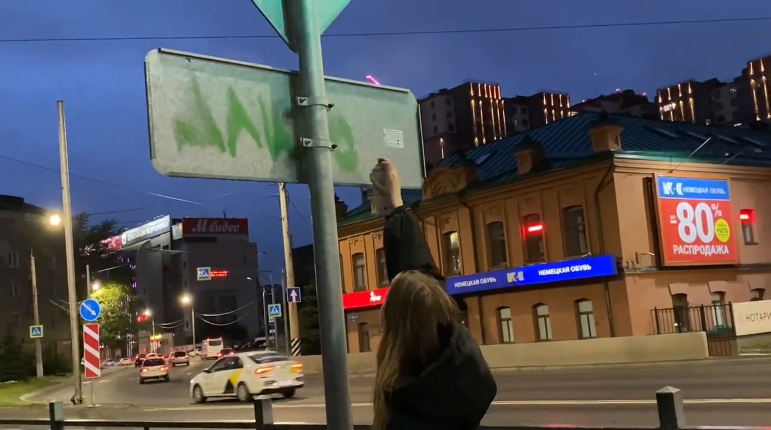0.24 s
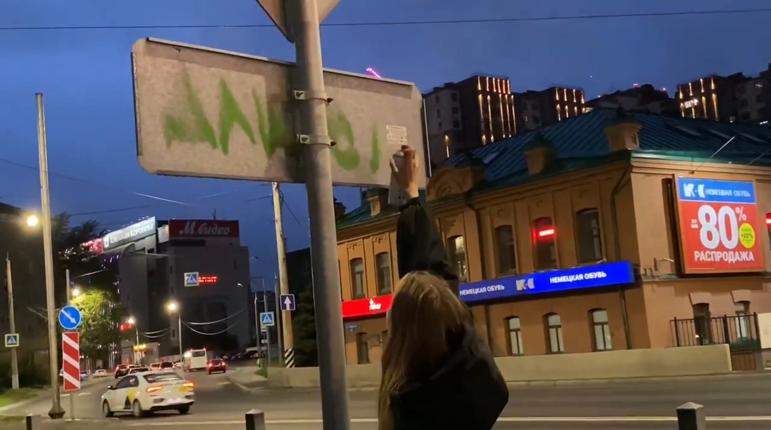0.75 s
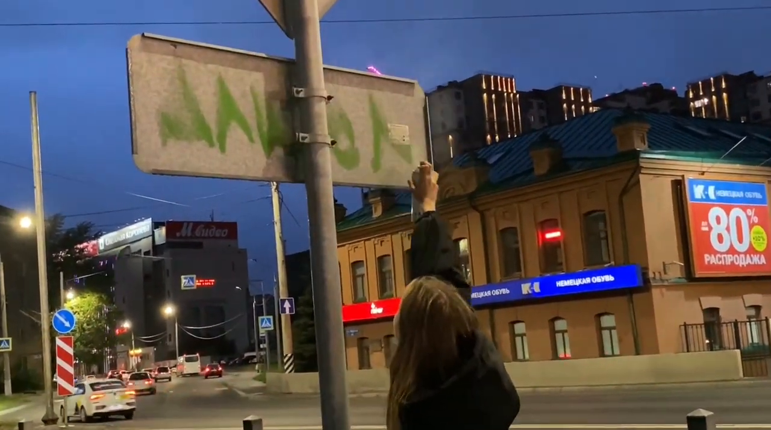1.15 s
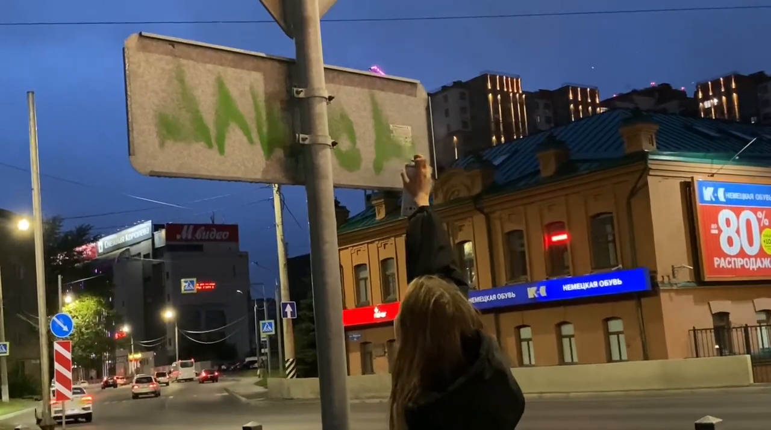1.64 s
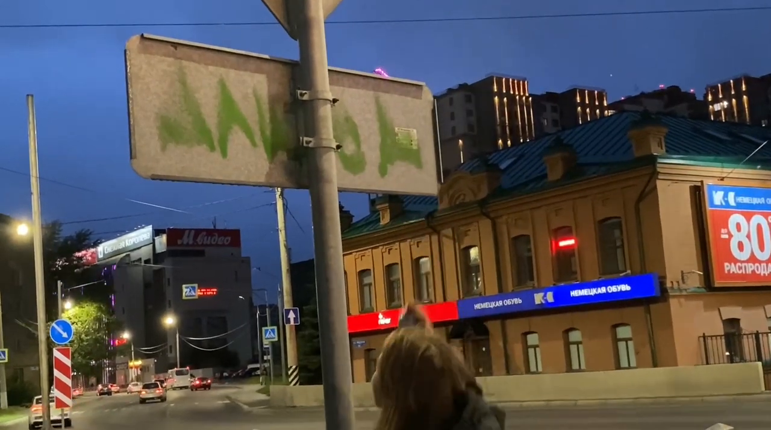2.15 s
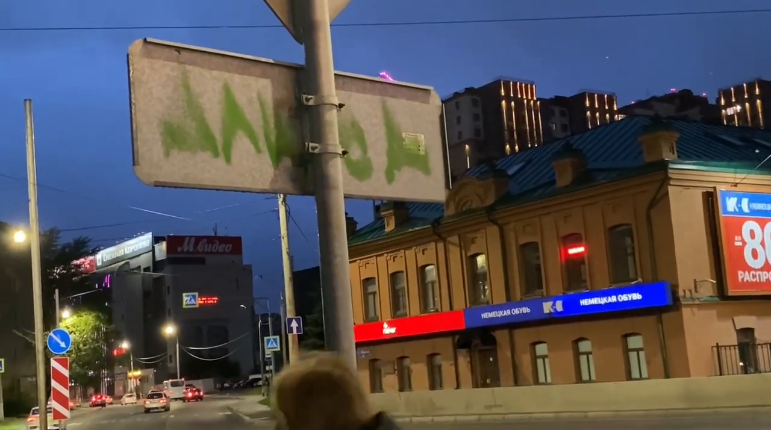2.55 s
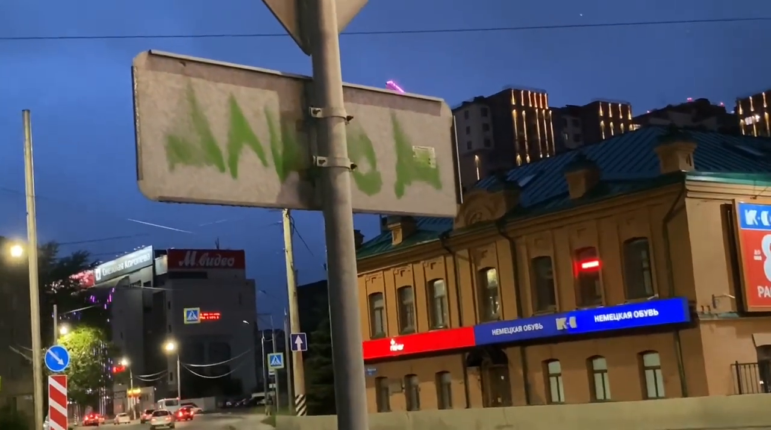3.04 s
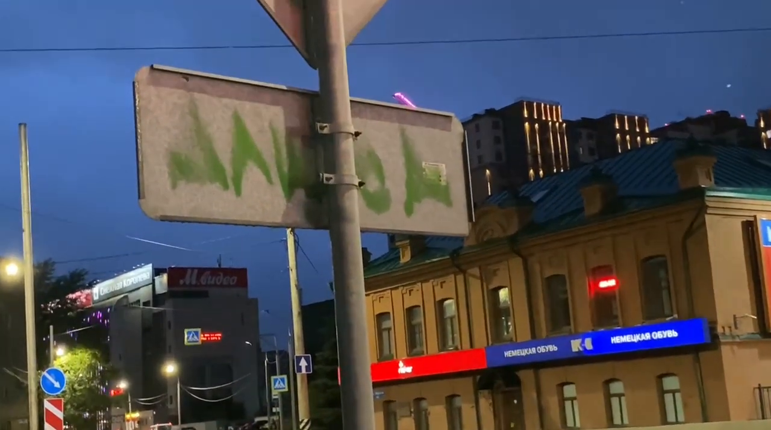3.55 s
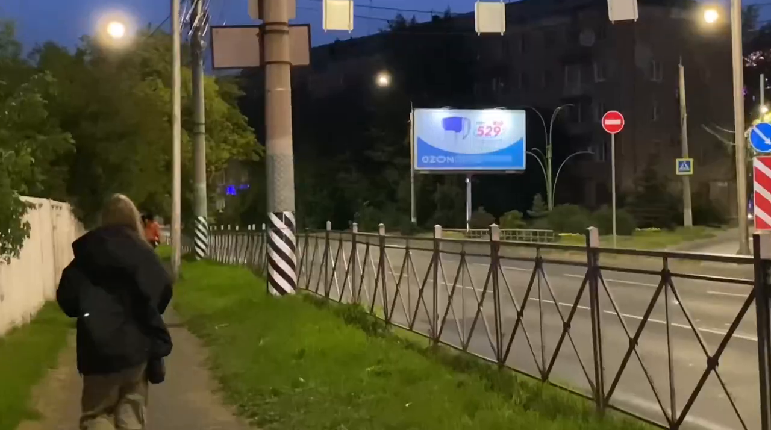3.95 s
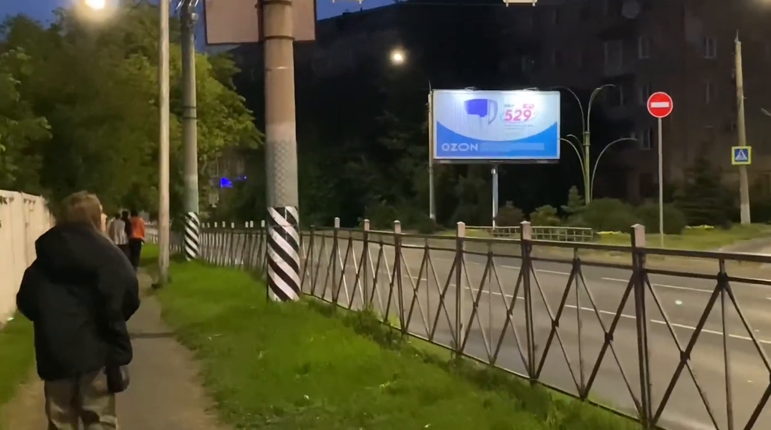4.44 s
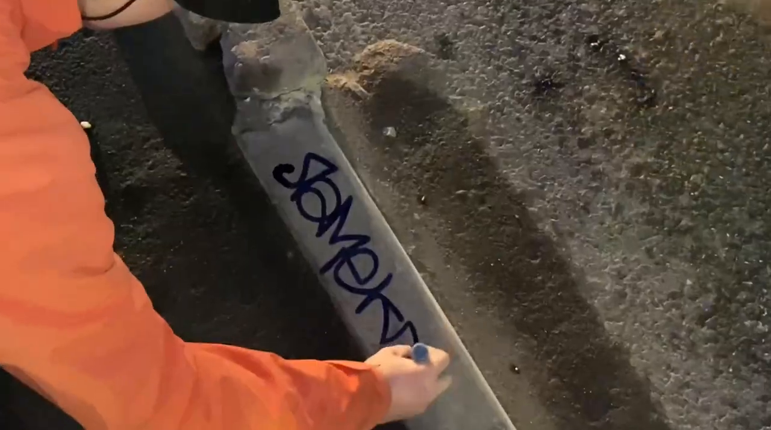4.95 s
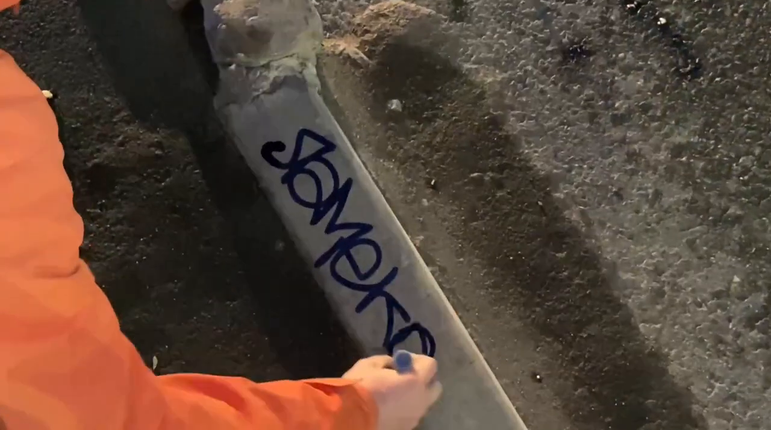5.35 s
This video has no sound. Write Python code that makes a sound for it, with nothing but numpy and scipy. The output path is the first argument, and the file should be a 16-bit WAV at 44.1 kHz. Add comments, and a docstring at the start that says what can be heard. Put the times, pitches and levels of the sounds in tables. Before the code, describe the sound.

Three roadside spots joined by hard cuts. First, low exhaust rumble, tyre roar, an idling drone and gliding engine notes, with light dry scratching close by. Then a softer, more distant street with hardly any detail. Last, loud low gusts and thumps overload the handheld microphone while a felt tip rasps on a hard surface.

```python
"""By a city road at night, heard from three spots cut hard one after the other.
Banded noise makes exhaust rumble, tyre roar and hiss; wavering sines make a drone and engine notes.
A marker scratches faintly close by as flickering treble noise, among light ticks of steps and pen.
At the last spot strong wind rumbles and slaps across the microphone ports as gusty low noise."""
import sys
import numpy as np
from scipy import signal
from scipy.fft import rfft, irfft, next_fast_len
from scipy.io import wavfile
from scipy.ndimage import uniform_filter1d

SR = 44100
rng = np.random.default_rng(int(sys.argv[2]) if len(sys.argv) > 2 else 0)


def wav_record(signal):
    """Record a signal, one row per channel, as 16-bit PCM in the file named by sys.argv[1]."""
    frames = np.transpose(np.atleast_2d(signal))
    bounded = np.clip(frames, -1, 1)
    # unit amplitude maps onto the largest positive 16-bit level
    quanta = np.round(bounded * 32767).astype(np.int16)
    wavfile.write(sys.argv[1], SR, quanta)


def to_linear_factor(level_db):
    """Convert decibel levels (scalar or array-like) to linear amplitude factors."""
    exponent = np.asarray(level_db, float) / 20
    return 10 ** exponent


N = 246940

# stay at each spot by the road: (start [s], end [s])
SPOTS = [(0, 3.8712), (3.879, 4.7935), (4.795, 5.6)]


def rms_one(x):
    """Scales to rms 1."""
    return x / np.sqrt(np.mean(x ** 2) + 1e-20)


def in_time(rows):
    """Columns of a table joined by straight lines, one value a sample."""
    s, *columns = np.transpose(rows)
    return [np.interp(np.arange(N) / SR, s, c) for c in columns]


def at_hz(points, hz):
    """Reads a spectrum on a log axis."""
    point_hz, point_db = np.array(points).T
    return np.interp(np.log(hz), np.log(point_hz), point_db)


def drift(rate_hz, size=N):
    """Slow chance through a double one-pole low-pass, drawn every 40 samples; spread 1."""
    r = np.exp(-80 * np.pi * rate_hz / SR)
    slow = signal.lfilter([1], [1, -2 * r, r * r], rng.standard_normal(size // 40 + 2002))[2000:]
    return np.interp(np.arange(size) / 40, np.arange(len(slow)), rms_one(slow))


def band(x, low_hz, high_hz, order=2):
    """Band-pass."""
    return signal.sosfilt(signal.butter(order, [low_hz, high_hz], "band", fs=SR, output="sos"), x)


def evened(x, span_s):
    """Noise with its own swells flattened, rms 1."""
    swell = np.sqrt(uniform_filter1d(x ** 2, int(span_s * SR), axis=-1) + 1e-12)
    return rms_one(x / swell)


def gate(spot):
    """Open while one spot is heard: short fade in, hard cut out."""
    # one fade a spot: (length [s])
    fade_in_s = [0.00025, 0.014, 0.0044]
    t = np.arange(N) / SR
    start, end = SPOTS[spot]
    return np.clip((t - start) / fade_in_s[spot], 0, 1) * (t < end)


def tone(hz, level_db, waver_hz):
    """A sine whose pitch wavers, at the given rms level."""
    phase = 2 * np.pi * np.cumsum(hz + waver_hz * drift(5.76)) / SR
    return np.sqrt(2) * to_linear_factor(level_db) * np.sin(phase)


def puffs(rows, noise):
    """Each row opens a bell-shaped window on its noise, centred on its time, with the given rms at the top."""
    out = np.zeros((2, N))
    for (s, level_db, length_ms), air in zip(rows, noise):
        bell = np.hanning(int(2 * length_ms * SR / 1000))
        at = int(s * SR) - len(bell) // 2
        piece = air[:, :len(bell)] * bell
        scale = np.sqrt(np.sum(bell ** 2) / np.sum(piece[0] ** 2))
        out[:, at:at + len(bell)] += to_linear_factor(level_db) * piece * scale
    return out


def street(spot):
    """Half-octave bands of noise, each flickering a little; rumble, roar, hiss and scratch follow their levels."""
    # where rumble meets roar and roar meets hiss: (edge [Hz])
    layer_edges_hz = [300, 2500]
    # colour of the street ahead, one list a spot: (frequency [Hz], relative density [dB per Hz])
    ahead_colour = [
        [(20, -25), (32, -3), (48, -5.5), (70, -2.5), (100, -6.5), (140, -7.5), (200, -12.5), (280, -12.5),
         (400, -13), (650, -16.5), (870, -13.5), (1050, -17.5), (1400, -19.5), (1750, -19), (2300, -26),
         (4000, -38), (6000, -44.5), (8300, -49), (11500, -75), (11900, -72)],
        [(20, -12), (32, -1), (48, -11), (70, -4), (100, -10), (200, -16), (380, -21.5), (700, -17.5),
         (1000, -20), (1400, -26), (1700, -24.5), (2700, -33.5), (4000, -43), (6000, -50.5), (8300, -60),
         (11500, -70), (11900, -77)],
        [(20, -9), (40, -4), (100, 8), (300, -5.5), (900, -23.5), (1700, -25), (2700, -27.5), (4000, -30),
         (6000, -35), (8300, -38), (11500, -49), (11900, -59)],
    ]
    # colour of the diffuse street around, the difference of the ports: (frequency [Hz], density [dB per Hz])
    around_colour = [
        [(20, -28), (45, -15), (70, -21), (200, -20), (600, -18.5), (1100, -15.5), (1450, -17.5), (1750, -23),
         (2050, -31), (2600, -43)],
        [(20, -40), (45, -23), (70, -26), (140, -27.5), (500, -25.5), (1000, -24.5), (1400, -26), (1700, -32),
         (2050, -43), (2600, -52)],
        [(20, -35), (60, -37), (400, -28), (900, -28), (1700, -28.5), (2300, -43)],
    ]
    # colour of the marker's scratch: (frequency [Hz], relative density [dB per Hz])
    scratch_colour = [(3000, -18), (6000, -3), (8000, -3), (9300, 0), (11300, -4.5), (11800, -9.5),
                      (12200, -44)]
    patchy_db, shared_db = 0.65, 1.1   # flicker of each band alone, and of all together

    first, last = int(SPOTS[spot][0] * SR), min(N, int(SPOTS[spot][1] * SR) + 1)
    size = next_fast_len(last - first)
    hz = np.maximum(np.arange(size // 2 + 1) * SR / size, 1)
    ahead, around, pen = rfft(rng.standard_normal((3, size)))
    colours_db = np.array([at_hz(ahead_colour[spot], hz), at_hz(around_colour[spot], hz)])
    noise = np.array([ahead, around]) * to_linear_factor(colours_db)
    layers = np.zeros((4, 2, size))   # rumble, roar, hiss, scratch; each ahead and around
    together = drift(1.0, size=size)
    for centre in 300 * 2 ** np.arange(-4.25, 6, .5):
        mask = np.cos(np.pi * np.clip(np.log2(hz / centre), -.5, .5)) ** 2
        flicker = to_linear_factor(shared_db * together + patchy_db * drift(5.0, size=size))
        layers[np.searchsorted(layer_edges_hz, centre)] += flicker * irfft(noise * mask, size)
    layers[3, 0] = irfft(pen * to_linear_factor(at_hz(scratch_colour, hz)), size)
    layers[3] *= to_linear_factor(1.94 * drift(18, size=size))      # the felt tip catches unevenly

    out = np.zeros((2, N))
    for layer, level_db in zip(layers, street_levels(spot)):
        even = layer[:, :last - first] / np.std(layer[0])
        out[:, first:last] += to_linear_factor(level_db[first:last]) * even
    return out


def street_levels(spot):
    """Rumble, roar, hiss and treble change at a constant rate; the marker's strokes rise out of the treble (dB)."""
    # traffic at the start of each spot: (exhaust rumble [dB], tyre roar [dB], tyre hiss [dB],
    # fading [dB per s], below zero where the traffic grows)
    traffic = [(-30.5, -35, -49.5, 1.0), (-35, -39, -56, 2.5), (-26.5, -39.5, -54, -2)]
    # flickering top treble between strokes, at the start of each spot: (level [dB])
    treble_db = [-65, -76.5, -56]
    # strokes of the marker close by: (start [s], length [s], level at the start [dB])
    strokes = [(0.0, .16, -61), (0.48, 0.7, -59), (1.42, 0.29, -58.5), (2.857, .05, -64), (4.25, .09, -69),
               (4.746, .04, -67), (5.026, 0.093, -53), (5.43, 0.11, -48.5)]
    treble_fading, hiss_fading = 0.83, 1.02   # how fast these fade against the rest
    attack_s, release_s, pressing_db = 0.012, 0.025, 3.0   # the tip presses harder towards the end

    t = np.arange(N) / SR
    rumble_db, roar_db, hiss_db, fading = traffic[spot]
    lost_db = fading * (t - SPOTS[spot][0])
    power = to_linear_factor(treble_db[spot] - treble_fading * lost_db) ** 2
    for s, length, level_db in strokes:
        rise = (t - s) / attack_s + 1
        fall = (s + length - t) / release_s + 1
        shape = np.clip(np.minimum(rise, fall), 0, 1)
        pressed_db = level_db + pressing_db * np.clip((t - s) / length, 0, 1)
        power = power + (shape ** 2 * to_linear_factor(pressed_db)) ** 2
    return [rumble_db - lost_db, roar_db - lost_db, hiss_db - hiss_fading * lost_db, 10 * np.log10(power)]


def drone():
    """The idling drone at the first two spots: a low sine whose level and pitch waver."""
    # one drone a spot: (mean level [dB])
    drone_db = [-34, -35.5]
    return sum(gate(k) * tone(71, level_db + 2.0 * drift(0.33), waver_hz=0.3)
               for k, level_db in enumerate(drone_db))


def passing_engine():
    """Three engine notes at the first spot, sines that glide as the speed changes."""
    # an engine pulling away through a gear change: (time [s], pitch [Hz], level [dB])
    pulling = [(0, 128, -46.5), (1.0, 154, -41.5), (2.3, 158.7, -47), (2.4, 146, -43.5), (3.1, 152, -43),
               (3.86, 166, -41.5)]
    # a deep throb: (time [s], pitch [Hz], level [dB])
    throb = [(0, 48.8, -53), (2.0, 46, -56), (2.85, 49.9, -36), (3.15, 50.6, -59), (3.6, 51.04, -32),
             (3.86, 52.6, -34)]
    # a higher hum: (time [s], pitch [Hz], level [dB])
    hum = [(0, 215.1, -50), (.9, 224.9, -40.5), (1.5, 234.7, -45.5), (3.86, 230, -53)]
    notes = tone(*in_time(pulling), waver_hz=1.57) + tone(*in_time(throb), waver_hz=0.56)
    return gate(0) * (notes + tone(*in_time(hum), waver_hz=2.43))


def ticks():
    """Brief bright scuffs near the microphone and one wider swish, all bells of band-passed noise."""
    # light ticks of steps and pen: (time [s], level [dB], width at half height [ms])
    tick_rows = [(0.4794, -55, 21), (1.43, -50, 35), (2.5594, -57, 30), (2.8794, -53.5, 39),
                 (4.2653, -58, 22), (5.079, -49, 26), (5.375, -52, 35)]
    # a sleeve or the pen drags past: (time [s], level [dB], width at half height [ms])
    swish_rows = [(5.5, -37, 27)]
    white = rng.standard_normal((len(tick_rows) + len(swish_rows), 2, 8000))
    scuffs = puffs(tick_rows, band(white[len(swish_rows):], 4400, 10600))
    swish = puffs(swish_rows, band(white[:len(swish_rows)], 1100, 3500))
    return (scuffs + swish)[0]


def whine():
    """A thin whine at the last spot: one high sine, unsteady in pitch and level."""
    # one row: (pitch [Hz], mean level [dB])
    whine_rows = [(3208, -61)]
    return gate(2) * to_linear_factor(2.0 * drift(6.6)) * tone(*whine_rows[0], waver_hz=9.34)


def gusts():
    """Eddies at the ports: lumpy rumble, thumps and flutter, each a band of noise following the gusts."""
    # strength of the wind on the ports: (time [s], level [dB])
    gust_rows = [(4.8, -32.5), (4.9, -18.5), (5.0, -25.5), (5.15, -25.5), (5.3, -21.5), (5.42, -26),
                 (5.6, -35)]
    gust_db, = in_time(gust_rows)
    mean_db = np.mean(gust_rows, axis=0)[1]
    swing_db = gust_db - mean_db
    white = rng.standard_normal((3, 2, N))
    # rumble follows a share of the swing, flutter more than all of it
    rumble_db = -1 + mean_db + 0.37 * swing_db + 1.5 * drift(5.7)
    thump_db = -2.5 + gust_db + 1.1 * drift(7.6)
    flutter_db = -12 + mean_db + 1.4 * swing_db + 3.56 * drift(71)
    rumble = evened(band(white[0], 35.3, 90), span_s=0.053) * to_linear_factor(rumble_db)
    thump = evened(band(white[1], 90, 230), span_s=0.016) * to_linear_factor(thump_db)
    flutter = rms_one(band(white[2], 230, 836)) * to_linear_factor(flutter_db)
    return rumble + thump + flutter


def slaps():
    """Short slaps of wind, bells of noise whose top edge rises with time; and the faint rasp on each."""
    # slaps of wind across the ports: (time [s], level [dB], width at half height [ms])
    slap_rows = [(4.805, -11.5, 9.1), (4.82, -14.5, 3.3), (4.879, -17.5, 9), (4.894, -13.5, 7.5),
                 (4.93, -17.5, 23.2), (4.962, -22.5, 13.2), (5.001, -28, 9), (5.027, -30, 14.3),
                 (5.08, -21, 25), (5.152, -22.5, 6.4), (5.163, -16, 4.1), (5.187, -15, 11),
                 (5.239, -19, 12), (5.261, -23, 8.2), (5.305, -19.5, 13), (5.323, -19.5, 10),
                 (5.359, -28, 10), (5.382, -17.5, 7), (5.428, -18, 5.1), (5.477, -27, 10)]
    later_s = np.array(slap_rows)[:, 0] - slap_rows[0][0]
    spread = np.exp(0.057 * rng.standard_normal(len(slap_rows)))
    tops_hz = (740 + 190 * later_s) * spread   # later slaps reach higher
    air = rng.standard_normal((len(slap_rows), 2, 8000))
    # the first 2000 samples let the filters settle
    body = [evened(band(a, 270, hz), span_s=0.014)[:, 2000:] for a, hz in zip(air, tops_hz)]
    rasp = puffs(slap_rows, band(air, 1060, 2900)[..., 2000:]) * to_linear_factor(-34.5)
    return puffs(slap_rows, body), rasp


def bumps():
    """Deep bumps of wind: bells of low noise, each with its own top edge."""
    # bumps on the ports: (time [s], level [dB], top edge [Hz], width at half height [ms])
    bump_rows = np.array([(4.819, -20, 101, 30), (4.9, -24, 161, 20), (5.2, -20.5, 199, 25),
                          (5.269, -16, 200, 20), (5.345, -16.5, 166, 25), (5.416, -23.5, 99, 25),
                          (5.494, -26, 109, 35)])
    air = rng.standard_normal((len(bump_rows), 2, 8000))
    body = [evened(band(a, 39.6, hz), span_s=0.037)[:, 2000:] for a, hz in zip(air, bump_rows[:, 2])]
    return puffs(bump_rows[:, [0, 1, 3]], body)


def wind():
    """Gusts, slaps and bumps under a steep top edge, with the rasp above it; fainter in the difference."""
    slap, rasp = slaps()
    steep = signal.butter(3, 1310, fs=SR, output="sos")      # eddies carry little above this
    side_db = -27
    return (signal.sosfilt(steep, gusts() + slap + bumps()) + rasp) * to_linear_factor([[0], [side_db]])


def port_turn(hz, spot):
    """High up the two ports turn out of phase: the sound passes from the sum to the difference and back."""
    # ports in opposite phase, one row a spot: (frequency of the flip [Hz], reach of the turn to either side [Hz])
    port_flip = [(8985, 2060), (9020, 2100), (7330, 2740)]
    flip_hz, span_hz = np.array(port_flip)[spot].T
    turn = np.clip(np.pi / 2 * (1 + (hz - flip_hz) / span_hz), 0, np.pi)
    return np.cos(turn), np.sin(turn), flip_hz, span_hz


def sum_and_difference(ahead, around):
    """Splits the sound over sum and difference; each falls silent where weak, in holes with wandering edges."""
    # the difference is heard from the street around only up to here, one value a spot: (ragged edge [Hz])
    around_top_hz = [2270, 2090, 1900]
    top_hz, edge_wander_hz, weakest_share = 11760, 190, 0.48

    hz, s, (front, diffuse) = signal.stft([ahead, around], SR, nperseg=1024)
    hz = hz[:, None]
    spot = np.searchsorted([end for start, end in SPOTS[:-1]], s)
    in_sum, in_difference, flip_hz, span_hz = port_turn(hz, spot)
    chance = uniform_filter1d(rng.standard_normal((3, len(s))), size=3) * np.sqrt(3)
    wander = edge_wander_hz * chance
    weakest = weakest_share + np.where(hz > flip_hz, wander[0], wander[1]) / span_hz
    mid = front * in_sum * (np.abs(in_sum) > weakest) * (hz < top_hz + wander[1])
    side = front * 1j * in_difference * (in_difference > weakest)
    side += diffuse * (hz < np.array(around_top_hz)[spot] + wander[2])
    return signal.istft([mid, side], SR, nperseg=1024)[1][:, :N]


def scene():
    """What comes from ahead and from around becomes sum and difference, then left and right."""
    ahead, around = sum(gate(k) * street(k) for k in range(3)) + gate(2) * wind()
    ahead = ahead + drone() + passing_engine() + ticks() + whine()
    mid, side = sum_and_difference(ahead, around)
    return np.array([mid + side, mid - side])


def top_cut(x):
    """Nothing passes above the cut-off."""
    return signal.sosfilt(signal.butter(12, 12390, fs=SR, output="sos"), x)


def record(dry):
    """The microphone drops the deepest bass through a second-order high-pass."""
    low_cut = signal.butter(2, 36, "high", fs=SR, output="sos")
    mix = signal.sosfilt(low_cut, dry)
    return top_cut(mix)


dry = scene()
out = record(dry)
wav_record(out)
```